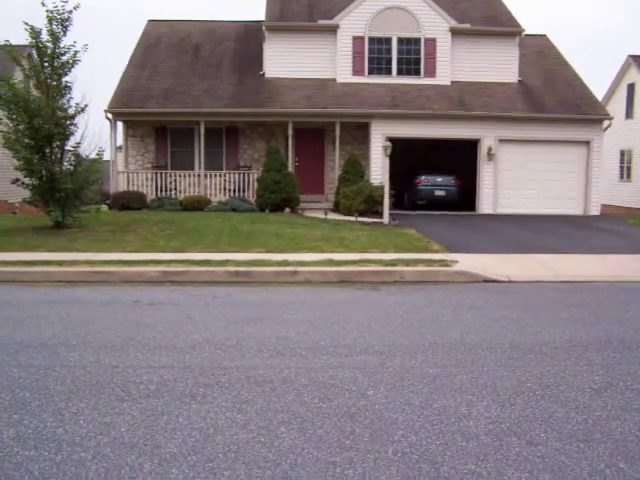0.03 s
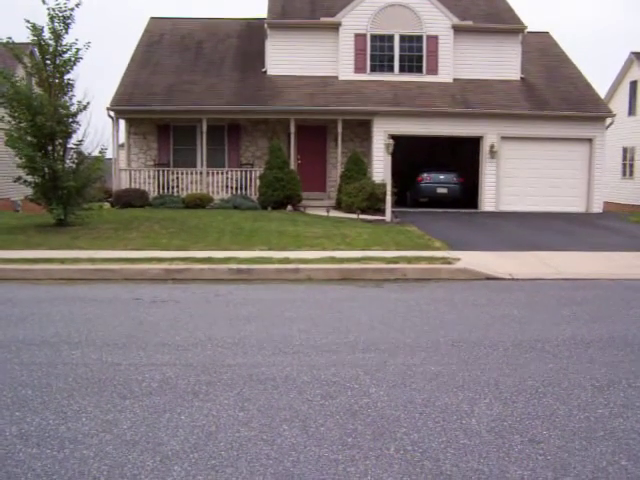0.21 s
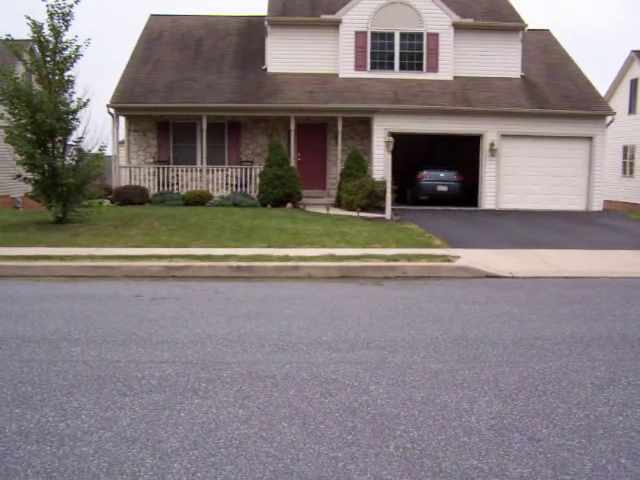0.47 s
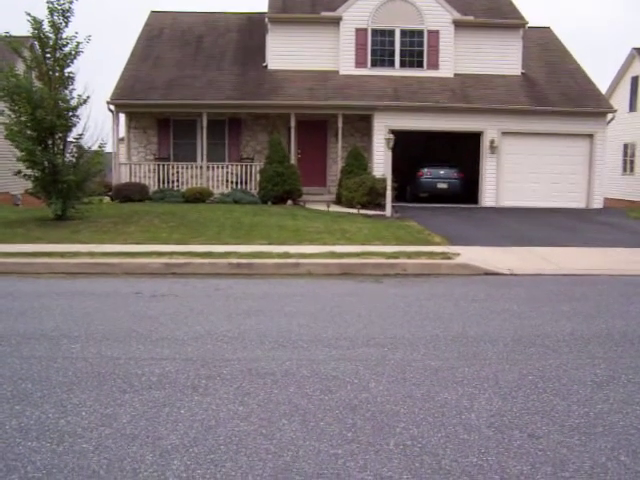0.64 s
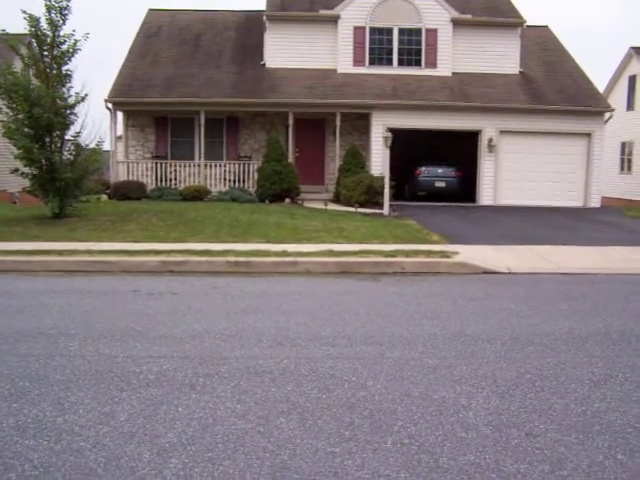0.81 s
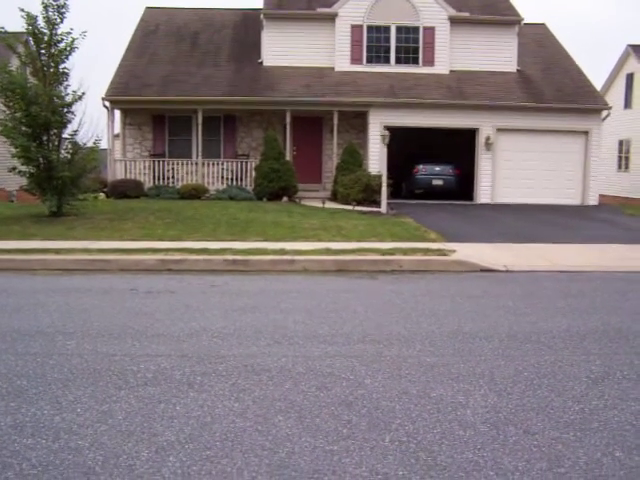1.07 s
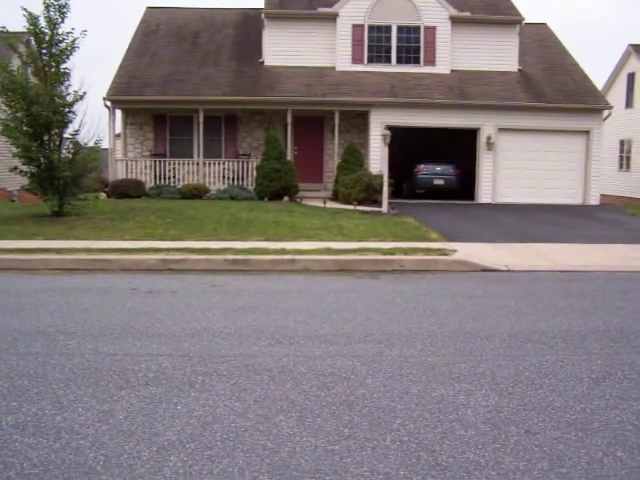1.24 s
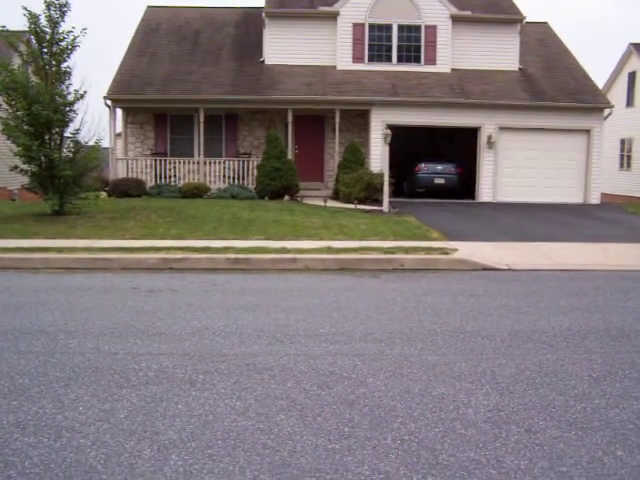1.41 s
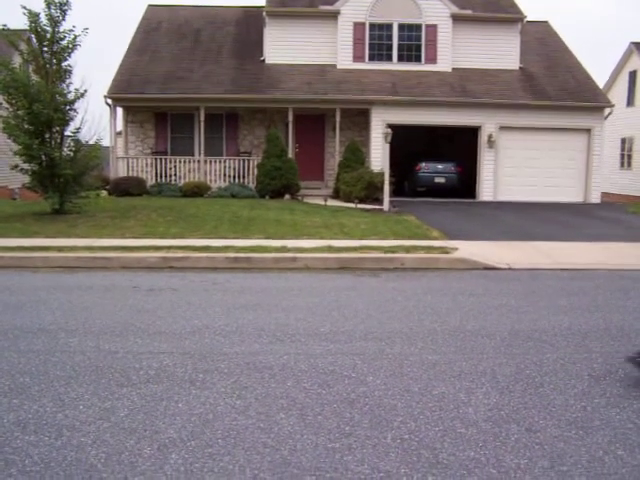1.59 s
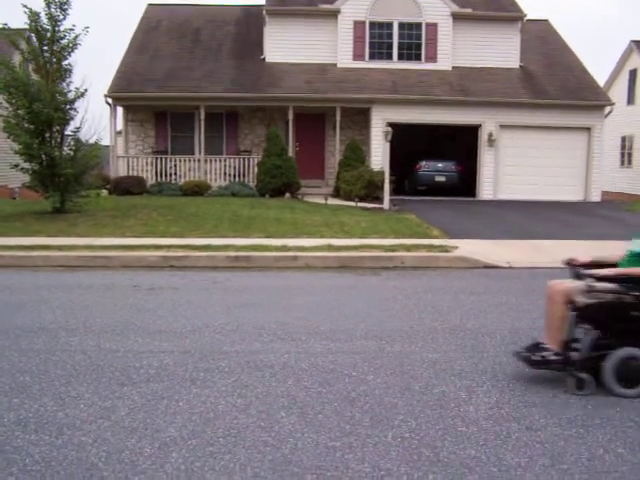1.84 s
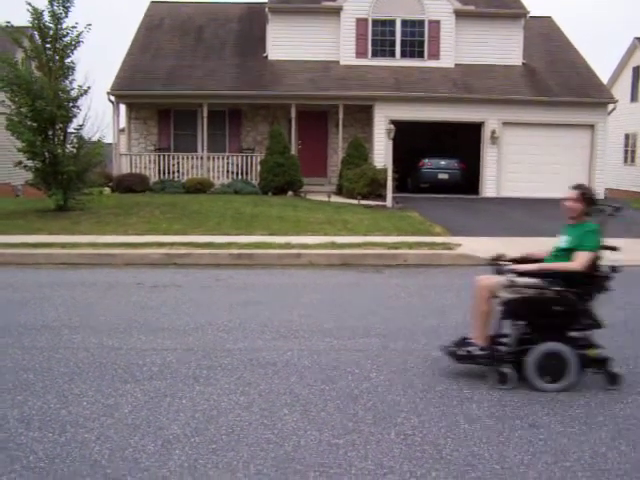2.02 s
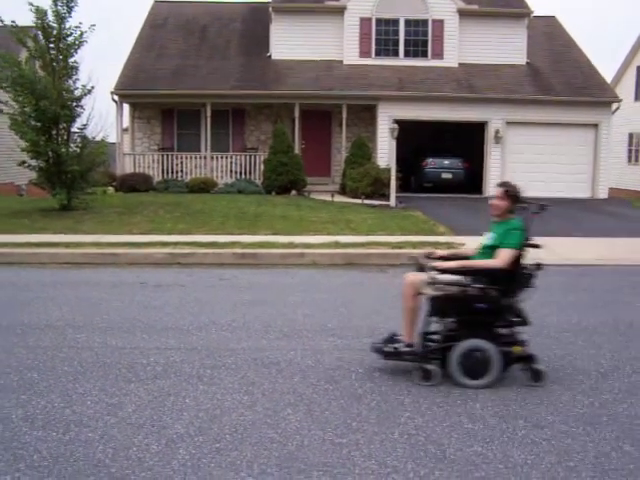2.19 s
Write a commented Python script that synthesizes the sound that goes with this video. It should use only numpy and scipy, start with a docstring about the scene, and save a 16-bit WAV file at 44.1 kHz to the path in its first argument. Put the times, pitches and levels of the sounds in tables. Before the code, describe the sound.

An electric wheelchair approaches with a rising gear whirr and motor whine, strongest at the end. Wind buffets the hissy microphone, mostly early on, while a sparrow and farther birds chirp over a distant hum on a suburban street.

```python
"""A power wheelchair rolls up from the side, motors whining, gears whirring, tyres hissing on asphalt.
Gusts of wind rumble and thump on a small, hissy camera microphone in a quiet residential street.
A sparrow chirps three times, its whistled glides scattered by the house fronts, and farther birds answer.
A few faint ticks sound close by, and a distant machine hums in wavering partials."""
import sys
import numpy as np
from scipy import signal
from scipy.fft import rfft, irfft
from scipy.io import wavfile
from scipy.ndimage import uniform_filter1d

SR = 44100
rng = np.random.default_rng(int(sys.argv[2]) if len(sys.argv) > 2 else 0)


def transcribe(signal):
    """Save signal, clipped to [-1, 1], as a 16-bit WAV file at the path in sys.argv[1]."""
    frames = np.atleast_2d(signal).T
    limited = np.clip(frames, -1, 1)
    pcm = np.round(limited * 32767).astype(np.int16)
    wavfile.write(sys.argv[1], SR, pcm)


N = 103635


def wheelchair(t):
    """Spherical spreading: tyre noise grows as 1/distance, and the directional drives grow faster."""
    # gear resonances (frequency [Hz], width [Hz], level at the nearest point [dB])
    gears = [(2467, 510, -51), (2810, 450, -46), (4704, 330, -50.5), (1106, 200, -50.5)]
    # partials of the two motors (frequency [Hz], level at the nearest point [dB])
    motors = [(2405, -50), (2490, -52), (4740, -54), (4900, -55)]
    # spectrum of tyres on asphalt (frequency [Hz], relative density [dB])
    tyres = [(100, -4.5), (350, -5), (700, -14), (1200, -13), (1900, -20.5), (2600, -9), (3600, -15.5),
             (4400, -14.5), (5500, -10.5), (6500, -30), (7200, -29), (8800, -63)]
    speed_m_s, nearest_s, nearest_m = 4.3, 2.22, 2.83
    nearness = nearest_m / np.hypot(nearest_m, speed_m_s * (t - nearest_s))
    whirr = sum(undb(db) * resonance(hz, width) for hz, width, db in gears)
    whirr *= undb(2 * walk(44.57))  # roughness
    whine = sum(tone(hz * (1 + 0.011 * walk(70))) * undb(db + walk(40)) for hz, db in motors)
    drive_gain = nearness ** 2.85  # the drives radiate sideways
    return drive_gain * (whirr + whine) + nearness * undb(-43) * noise(tyres)


def wind(t):
    """Turbulent pressure on the microphone: gusts rumble, and strong eddies pull short pressure dips."""
    # gusts (start [s], length [s], level [dB])
    gusts = [(0.204, 0.064, -35), (0.353, 0.075, -25), (0.452, 0.08, -25), (0.562, 0.055, -25),
             (0.687, 0.032, -32.5), (0.854, 0.043, -31.5), (.91, 0.058, -32.5), (0.951, 0.068, -27.5),
             (1.228, 0.075, -36.5), (1.344, .11, -33.5), (1.648, .032, -32), (1.728, 0.095, -32),
             (1.986, 0.03, -24.5), (2.05, 0.031, -32)]
    # spectrum of the turbulence (frequency [Hz], relative density [dB])
    rumble = [(18, -13.5), (40, -1.5), (85, 0), (130, -5), (200, -9), (300, -23.5), (500, -36), (1000, -63),
              (5000, -97.5)]
    # thumps of single eddies (time [s], peak level [dB], pitch [Hz])
    eddies = [(0.369, -9.5, 176.7), (0.4121, -4.5, 111.8), (0.4223, -8, 226), (.431, -14.5, 292),
              (0.488, -19.5, 66), (.603, -17, 118), (0.874, -17, 70), (.954, -21, 145), (.988, -16.5, 85),
              (1.774, -19.5, 121), (1.991, -39, 84.4), (2.012, -27, 85)]
    attack_s, release_s = 0.0028, 0.016
    envelope = np.zeros(N)
    for start, length, db in gusts:
        rise = np.clip((t - start) / attack_s + .5, 0, 1)
        fall = np.exp(-np.maximum(t - start - length, 0) / release_s)
        envelope += undb(db) * rise * fall
    turbulence = noise(rumble)
    running_rms = np.sqrt(uniform_filter1d(turbulence ** 2, size=1500) + 1e-9)
    out = envelope * turbulence / running_rms
    for centre, db, hz in eddies:
        u = (np.pi * hz * (t - centre)) ** 2
        out -= undb(db) * (1 - 2 * u) * np.exp(-np.minimum(u, 50))  # a dip between two smaller crests
    return out


def sparrow(t):
    """Frequency modulation: five quick gliding notes make each chirp, which echoes between the houses."""
    # chirps (time [s], level [dB], echo relative to the chirp [dB])
    chirps = [(.282, -29, -5.5), (1.058, -39.5, 2.5), (1.687, -38, 1)]
    # notes (delay [s], length [s], start pitch [Hz], middle pitch [Hz], end pitch [Hz], gain [dB])
    notes = [(0, 0.02, 3760, 3707, 3760, -0.5), (.017, .01, 3900, 4050, 4120, -4),
             (.028, .016, 3100, 3340, 3520, -4), (.037, .017, 3640, 3734, 3660, -5),
             (.048, .014, 3200, 3070, 3200, -7.5)]
    out = np.zeros(N)
    for start, db, echo_db in chirps:
        call = sum(undb(db + note_db) * note(t, start + delay, length, pitches)
                   for delay, length, *pitches, note_db in notes)
        out += echoed(t, call, echo_db)
    return out


def far_birds(t):
    """Linear frequency sweeps: farther birds answer in soft slurs, nearly matched by their echo."""
    # slurs (time [s], length [s], start pitch [Hz], end pitch [Hz], level [dB])
    slurs = [(0.384, 0.033, 3300, 2990, -54), (0.45, 0.031, 4000, 4230, -41.5),
             (1.123, 0.019, 3850, 3720, -44), (1.444, 0.034, 3380, 3190, -45),
             (1.476, .016, 3760, 3960, -43), (1.771, 0.055, 4350, 3900, -47),
             (1.848, 0.042, 3520, 3020, -44)]
    calls = sum(undb(db) * note(t, start, length, pitches) for start, length, *pitches, db in slurs)
    return echoed(t, calls, echo_db=-2.5)


def ticks(t):
    """Exponential decay: tiny dry bursts of noise die within milliseconds."""
    # bursts (time [s], starting level before filtering [dB], decay time [s])
    bursts = [(0.0636, -29.5, 0.0034), (.137, -30.5, 0.0019), (0.21, -32, 0.0018), (0.411, -31.5, 0.0028),
              (0.9279, -31, .0015), (1.639, -34, .0015), (2.008, -33, 0.0023), (2.088, -33, 0.0013)]
    # spectrum of a tick (frequency [Hz], relative density [dB])
    colour = [(1000, -14.5), (1900, -11), (2350, 6), (3000, -14.5), (4100, 1.5), (6000, -9.5), (8200, -23),
              (9000, -48)]
    envelope = sum(undb(db) * (t >= start) * np.exp(-np.clip((t - start) / decay, 0, 20))
                   for start, db, decay in bursts)
    return coloured(envelope * rng.standard_normal(N), colour)


def machine_hum(t):
    """A line spectrum: each partial of a distant machine wavers slightly in pitch and level."""
    # envelope of the main partial (time [s], level [dB])
    main_level = [(0, -35), (.35, -37), (.55, -41), (1.6, -44.5), (1.9, -41), (2.35, -42.5)]
    # weaker partials (frequency [Hz], level [dB])
    partials = [(127, -52), (245, -54), (395, -52), (1292, -61), (1647, -55.5)]
    main_hz, main_db = 188.6, np.interp(t, *np.array(main_level).T)
    return sum(tone(hz * (1 + 0.0049 * walk(14))) * undb(db - 0.5 * walk(6.07))
               for hz, db in [(main_hz, main_db), *partials])


def hiss():
    """A broadband noise floor: microphone hiss and the distant town at a nearly even level."""
    # spectrum of the floor (frequency [Hz], relative density [dB])
    colour = [(25, 2.5), (60, 1.5), (120, 4), (200, -5), (290, -6), (400, -4), (520, -7.5), (750, -14.5),
              (1100, -11.5), (1450, -13), (1700, -12), (2200, -13), (2700, -22), (3500, -17), (4200, -12),
              (5000, -14), (5800, -17.5), (6500, -28), (7200, -30), (8000, -44), (8500, -50), (8900, -62)]
    return noise(colour) * undb(-34.5 - 0.04 * walk(16))


def note(t, start, length, pitches):
    """A whistled glide: a sine sweeps through its pitches, trembling, under a half-sine envelope."""
    progress = np.clip((t - start) / length, 0, 1)
    hz = np.interp(progress, np.linspace(0, 1, len(pitches)), pitches)
    return np.sin(np.pi * progress) * tone(hz * (1 + .008 * walk(400)))


def echoed(t, call, echo_db):
    """Reverberation: scatter from the house fronts adds a decaying tail to a call."""
    t60_s, build_up_s = 0.55, 0.036
    tail = rng.standard_normal(N) * np.exp(-np.log(1000) * t / t60_s) * np.minimum(t / build_up_s, 1)
    echo = signal.fftconvolve(call, tail / np.linalg.norm(tail))[:N]
    return call + undb(echo_db) * echo * walk(600)  # fast modulation blurs the echo's pitch


def resonance(hz, width):
    """Resonance: noise of rms 1 rings in one steep-sided band."""
    f = np.arange(N // 2 + 1) * SR / N
    return unit(irfft(rfft(rng.standard_normal(N)) / (1 + ((f - hz) / width) ** 2 * 2), N))


def tone(hz):
    """A sine of rms 1 whose phase is the integral of its frequency."""
    return np.sqrt(2) * np.sin(2 * np.pi * np.cumsum(hz) / SR)


def noise(colour):
    """Spectrally shaped noise of rms 1."""
    return unit(coloured(rng.standard_normal(N), colour))


def coloured(x, colour):
    """Linear filtering by (frequency [Hz], relative gain [dB]) points, keeping white noise's power."""
    f = np.arange(N // 2 + 1) * SR / N + 1e-3
    hz, db = np.array(colour).T
    gain = undb(np.interp(np.log(f), np.log(hz), db))
    gain *= f ** 2 / (f ** 2 + 10 ** 2)  # infrasound rolls off below 10 Hz
    return irfft(rfft(x) * unit(gain), N)


def walk(rate):
    """Smooth random modulation of rms 1 that changes about rate times a second."""
    hold = max(int(SR / rate), 2)
    steps = np.repeat(rng.standard_normal(N // hold + 1), hold)
    return unit(uniform_filter1d(uniform_filter1d(steps, hold), hold)[:N])


def undb(db):
    """Decibels to amplitude ratio."""
    return 10 ** (np.asarray(db) / 20)


def unit(x):
    """Normalisation to an rms of 1."""
    return x / np.sqrt(np.mean(x ** 2) + 1e-20)


def scene():
    """Superposition: the pressures of all sources add at one microphone."""
    t = np.arange(N) / SR
    return (hiss() + machine_hum(t) + wind(t) + far_birds(t) + sparrow(t) + ticks(t) + wheelchair(t))[None]


def record(dry):
    """Band limiting: the camera's steep low-pass filter cuts the top of the treble."""
    cutoff_hz = 8850
    return signal.sosfilt(signal.ellip(10, .2, 80, cutoff_hz, fs=SR, output="sos"), dry)


dry = scene()
out = record(dry)
transcribe(out)
```